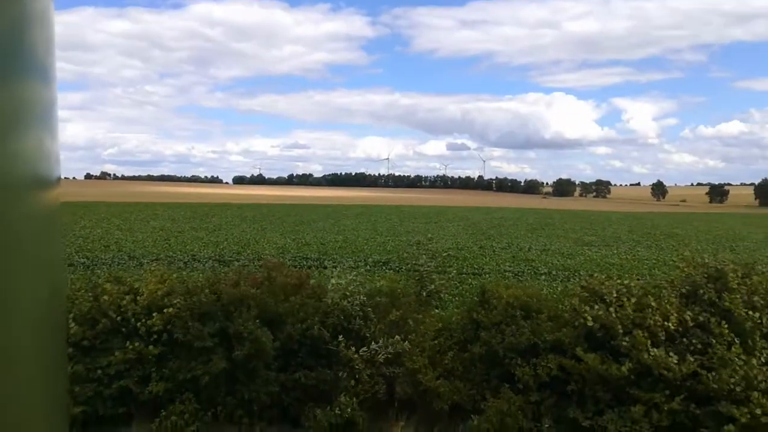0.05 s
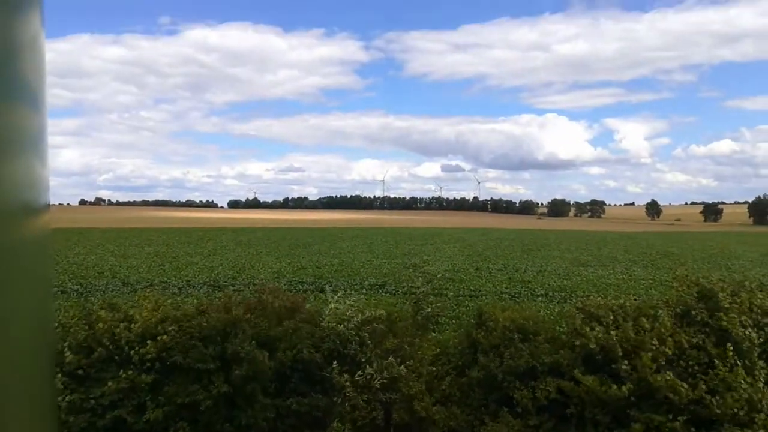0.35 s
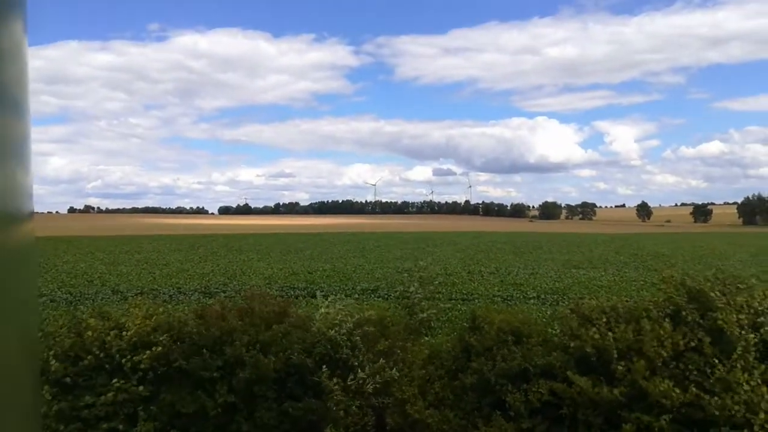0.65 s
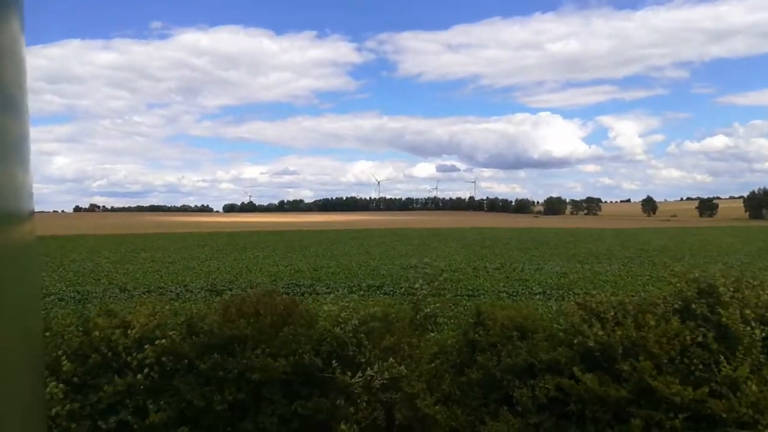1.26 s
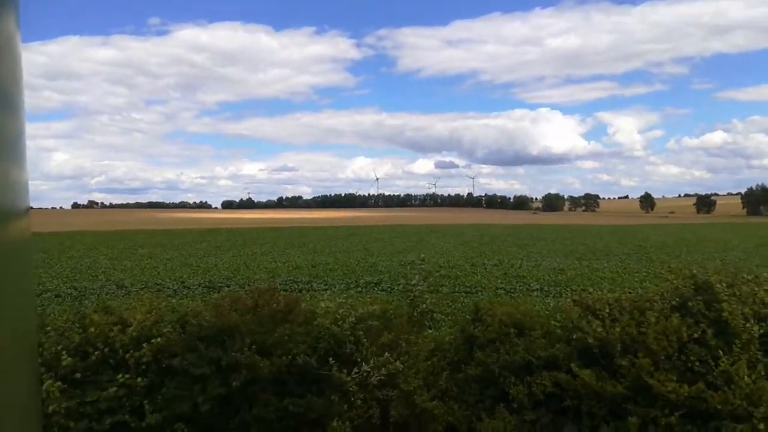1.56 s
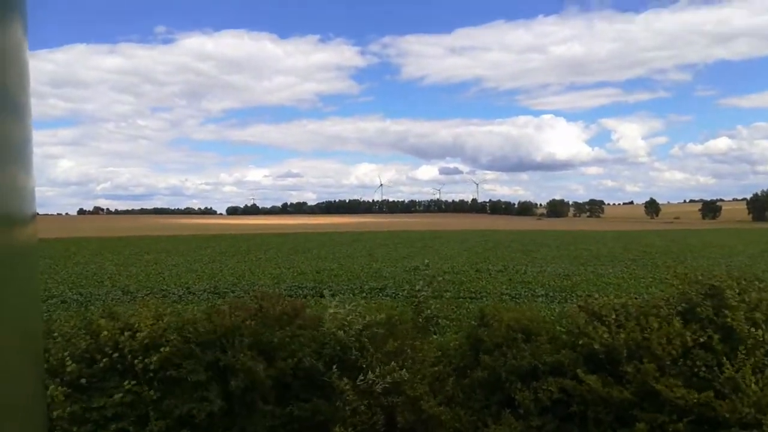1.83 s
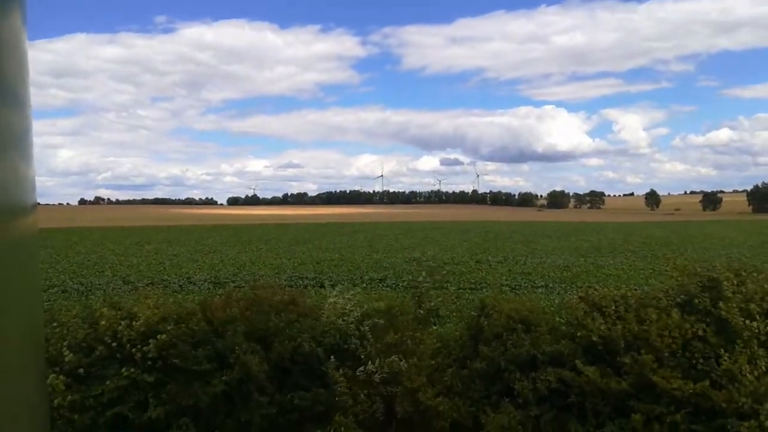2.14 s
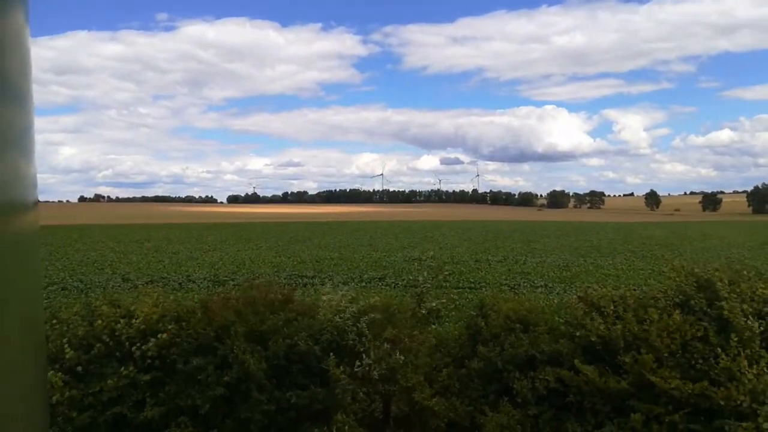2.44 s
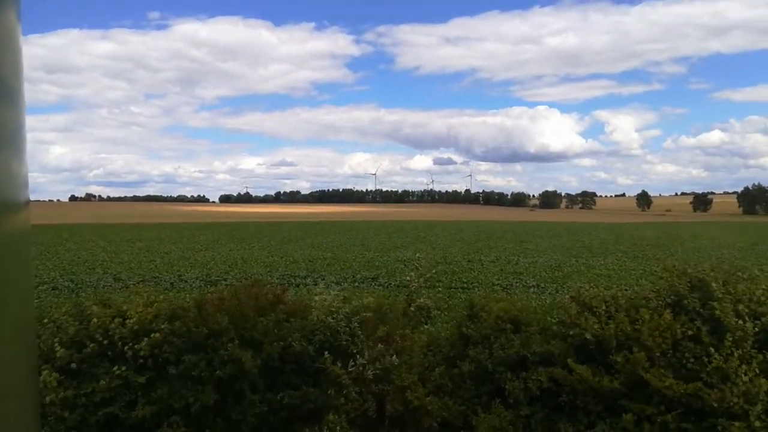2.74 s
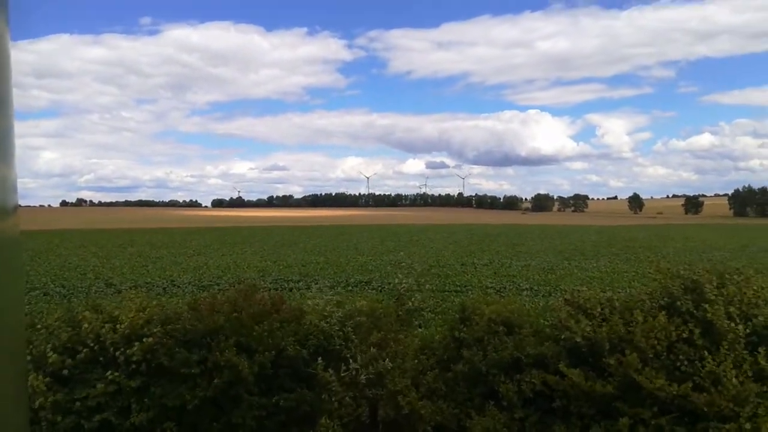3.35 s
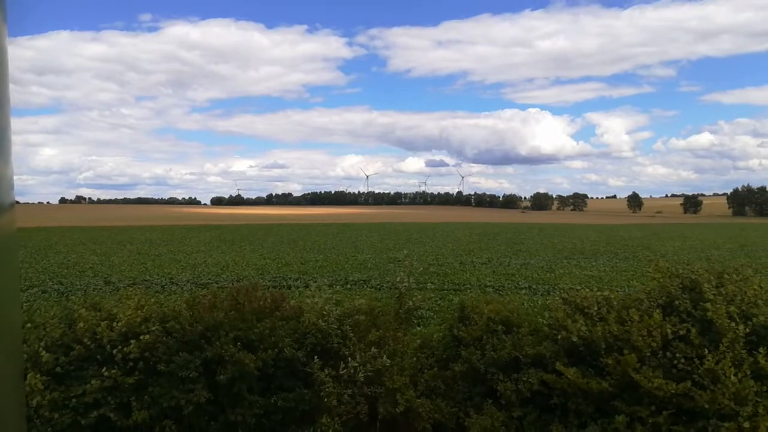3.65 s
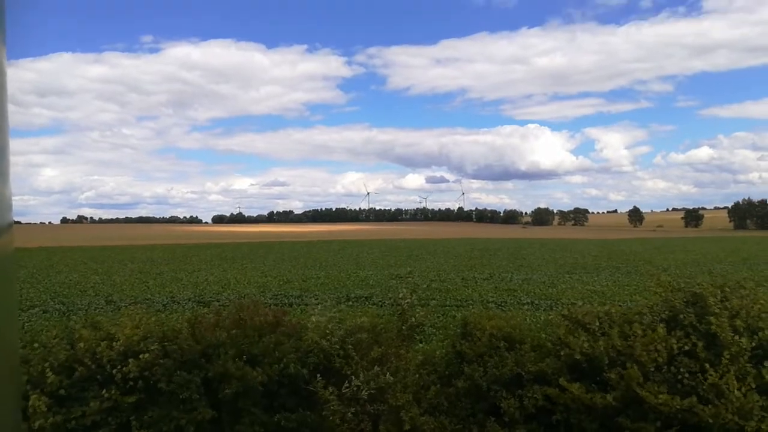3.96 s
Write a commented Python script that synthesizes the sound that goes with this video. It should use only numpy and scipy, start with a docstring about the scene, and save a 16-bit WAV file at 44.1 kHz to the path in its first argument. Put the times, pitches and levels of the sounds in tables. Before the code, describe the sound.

Uneven wind gusts buffet the microphone with a low rumble, fluttering and a few bumps.

```python
"""Wind gusts in an open field buffet the two ports (openings) of a hand-held microphone.
Big eddies (swirls of air) rumble; small ones flutter, turning into a rasp as the flow quickens.
The air tears away from the right port in hard puffs, and an eddy that hits a port squarely bumps.
Under it lie faint hiss and a thin electronic whine.
Each port leaks, late and dull, into the other channel."""
import sys
import numpy as np
from scipy.fft import rfft, irfft, next_fast_len
from scipy.io import wavfile
from scipy.ndimage import uniform_filter1d, map_coordinates

SR = 44100
rng = np.random.default_rng(int(sys.argv[2]) if len(sys.argv) > 2 else 0)


def wav_record(signal):
    """Record a signal, one row per channel, as 16-bit PCM in the file named by sys.argv[1]."""
    frames = np.transpose(np.atleast_2d(signal))
    bounded = np.clip(frames, -1, 1)
    # unit amplitude maps onto the largest positive 16-bit level
    quanta = np.round(bounded * 32767).astype(np.int16)
    wavfile.write(sys.argv[1], SR, quanta)


N = 176400

# The underlying wind. A pan is left minus right, so below zero means to the right.
# Columns: time_s, rumble_db, flutter_db, flutter_pan_db
WIND_FLOW = [(0.0, -36.5, -60, 24), (0.25, -32, -55, 8), (0.45, -28.5, -41, 2), (0.55, -39, -67, 3),
             (0.8, -47.5, -75, 14), (1.0, -44.5, -72, -10), (1.09, -38, -72, -10),
             (1.22, -24.5, -26.5, -20), (1.38, -24.5, -36, -24), (1.6, -28.5, -44, 24),
             (1.8, -25.5, -60, -18), (2.0, -35, -61, 19), (2.35, -32.5, -56, -7), (2.7, -31.5, -50.5, 22),
             (3.02, -31.5, -52.5, -11), (3.14, -23, -27, 22), (3.26, -29, -44, -9), (3.5, -27.5, -31, -2.5),
             (3.61, -27, -40.5, -3), (3.7, -27.5, -30, -11), (3.83, -19.5, -24, -17), (4.0, -26, -31, 1.5)]
# Short puffs on top of it. Columns: centre_s, half_length_s, rumble_db, flutter_db, flutter_pan_db
WIND_PUFFS = [(0.144, 0.0073, -31.5, -40, -21), (0.241, 0.05, -33, -43.5, 5),
              (0.38, 0.037, -41, -39.5, -16), (0.425, 0.012, -31, -35, -17), (0.576, 0.0056, -32, -56, 19),
              (0.739, 0.011, -33.5, -60, 8), (1.042, 0.016, -26, -39, -13),
              (1.137, 0.022, -25, -35.5, -5.5), (1.19, 0.015, -27, -27, -23), (1.264, 0.024, -33, -22, -16),
              (1.329, 0.021, -23.5, -22, -19), (1.372, 0.012, -36, -25.5, -12),
              (1.417, 0.017, -16, -23.5, 19), (1.468, 0.01, -24, -31.5, 8), (1.505, 0.006, -16, -34.5, 10),
              (1.515, 0.015, -19.5, -28, -25), (1.566, 0.0083, -19, -30, -14), (1.612, 0.012, -21, -41, 14),
              (1.672, 0.016, -22, -32, -19), (1.715, 0.013, -29, -28, -8),
              (1.762, 0.018, -29.5, -28.5, -14), (1.807, 0.011, -41, -24, -14),
              (1.852, 0.0091, -20, -32.5, 5), (1.897, 0.0045, -22, -36.5, 24),
              (1.95, 0.015, -21.5, -30.5, -11), (2.06, 0.022, -23.5, -40.5, 4),
              (2.141, 0.0083, -22, -43, -19), (2.215, 0.029, -24.5, -43, 7), (2.425, 0.044, -27, -45.5, 17),
              (2.589, 0.014, -24, -37, 5), (2.737, 0.0063, -23.5, -64, 12), (2.84, 0.0044, -27, -35, -24),
              (2.937, 0.02, -34, -29.5, -26), (2.999, 0.0056, -32, -38, 13),
              (3.088, 0.008, -20.5, -30.5, -10), (3.142, 0.016, -28, -23.5, -13),
              (3.204, 0.0037, -39, -27, 22), (3.297, 0.017, -23, -31.5, -8), (3.356, 0.014, -25, -32, -22),
              (3.436, 0.011, -23.5, -18, -19), (3.522, 0.0056, -18, -23, -12),
              (3.545, 0.023, -24, -25.5, -25), (3.655, 0.011, -21.5, -21.5, -12),
              (3.683, 0.015, -20.5, -20, -33), (3.721, 0.0061, -22, -25, -21),
              (3.794, 0.0063, -29, -20.5, -19), (3.862, 0.011, -24, -22, -26),
              (3.888, 0.017, -41, -21.5, -28)]
# Bursts where the air tears away from the right port. Columns: centre_s, half_length_s, level_db
TEAR_BURSTS = [(1.261, 0.0085, -35.5), (1.328, 0.004, -38.5), (1.753, 0.0016, -25.5), (3.141, .006, -48),
               (3.429, 0.005, -37), (3.649, 0.0036, -33.5), (3.681, 0.0044, -32), (3.698, 0.0037, -29.5),
               (3.79, .005, -35.5), (3.865, 0.0058, -21), (3.877, 0.023, -33)]
# Single eddies that hit a port. Columns: centre_s, level_db, half_length_s, pan_db
EDDY_HITS = [(0.2767, -16, 0.00049, 20), (0.379, -19.5, 0.0005, -16), (1.044, -21.5, 0.00058, -14),
             (1.3222, -7.5, 0.0005, -17), (1.475, -14.5, 0.00026, -17), (1.566, -18, 0.0012, -10),
             (1.662, -15, 0.0029, 7), (1.7534, -2, 0.0014, -17), (1.808, -29, .0005, -19),
             (2.577, -20, 0.00095, -22), (3.001, -24.5, .0006, 17), (3.4265, -7, 0.0013, -34),
             (3.496, -13.5, 0.0018, 8), (3.653, -6.5, 0.0018, -33), (3.86, -7.5, .002, -12)]
# The tone colour of each noise. Columns: frequency_hz, relative_level_db
RUMBLE_COLOUR = [(15, -9), (30, -11.5), (55, 0), (100, -4.5), (170, -5.5), (280, -13.5), (450, -32),
                 (900, -66), (3500, -120)]
BODY_COLOUR = [(60, -66), (140, -5.5), (230, -2), (350, -1.5), (550, -8), (900, -17.5), (1600, -63),
               (4000, -58), (12000, -120)]
FLUTTER_COLOUR = [(150, -16), (400, 0), (700, 3), (1200, -4), (1700, -15.5), (2500, -24.5), (4000, -35.5),
                  (8000, -61), (15000, -100)]
RASP_COLOUR = [(600, -18), (1400, 5.5), (2500, -5.5), (4000, -17), (6500, -27), (10000, -48), (15000, -63)]
TEAR_COLOUR = [(700, -26), (1600, 6.5), (3000, 1), (4500, -5), (7000, -13), (10000, -20), (15000, -43)]
HISS_COLOUR = [(100, -9), (600, -16.5), (1100, -1.5), (1500, -1), (1950, 6), (2250, -1.5), (2650, -6.5),
               (3000, 0.5), (3500, 3.5), (4600, -1.5), (6600, -3), (8500, -11.5), (10000, -12.5),
               (12000, -17), (15000, -21)]
# The whine's tones that waver round a set level. Columns: pitch_multiple, level_db, waver_db
WHINE_TONES = [(1, -55.5, 0.27), (4, -82, 3)]
# Its tones at two and three times the pitch, which swell and fade. Columns: time_s, level_db
WHINE_SECOND_TONE = [(0, -56.5), (.3, -58), (.4, -61.5), (.65, -62), (.85, -55.5), (1.15, -56.5),
                     (1.3, -60), (1.55, -54.5), (1.7, -61.5), (2.35, -64), (2.43, -80), (2.53, -62),
                     (2.85, -63), (3.07, -68), (3.2, -62.5), (4, -64)]
WHINE_THIRD_TONE = [(0, -78), (.4, -79), (1, -70.5), (1.3, -85), (1.55, -69), (2.2, -71), (2.45, -67),
                    (3, -67), (3.7, -78), (4, -66)]

RUMBLE_GAIN_DB, BODY_GAIN_DB, FLUTTER_GAIN_DB, RASP_GAIN_DB = -2.5, -5.5, 0.5, -12.5
BODY_SHARE, BODY_LIFT_DB = 0.29, 9.5  # how far the body follows the flutter rather than the rumble
RASP_PIVOT_DB, RASP_GROWTH = -27, 1.92  # the rasp outgrows the flutter in strong flow
SPUTTER_HZ, SPUTTER_DB = 28.05, 1  # chance swings of the whole flow
PORT_SWING_HZ, PORT_SWING_DB = 39.98, 1.3  # chance swings at each port alone
SNAP_S, SNAP_DB, FIZZ_S, FIZZ_DB = 0.00022, -8, 0.0038, -11.5  # suction at an eddy's core, fizz round it
RING_HZ, RING_DECAY_S, RING_DB = 1010, 0.0015, -9  # the hollow of the port, knocked by an eddy
WHINE_HZ, HISS_DB = 3924.3, -55
TEAR_PAN_DB, WHINE_PAN_DB, HISS_PAN_DB = -26.5, -28, -7
LEAK_DELAY_S, LEAK_CUTOFF_HZ, LEAK_BASS_GAIN, LEAK_TREBLE_GAIN = 0.0005236, 330, 0.92, 0.067
TREBLE_LIMIT_HZ = 15800


def wind():
    """Big eddies rumble on both ports; smaller ones flutter and rasp on the port facing the flow."""
    rumble_db, flutter_db = flow_levels()
    sputter_db = SPUTTER_DB * wobble(SPUTTER_HZ, channels=1)
    rumble_db = rumble_db + sputter_db
    flutter_db = flutter_db + sputter_db + PORT_SWING_DB * wobble(PORT_SWING_HZ)
    body_db = rumble_db + BODY_SHARE * (flutter_db + BODY_LIFT_DB - rumble_db)
    rasp_db = RASP_PIVOT_DB + RASP_GROWTH * (flutter_db - RASP_PIVOT_DB)
    eddies = unit(wobble(75, channels=1) + 0.62 * wobble(110) + 0.93 * wobble(320))
    low_noise = lumpy(noise(RUMBLE_COLOUR), wobble(50, channels=1), depth_db=2.64, span_s=0.06)
    rumble = amp(rumble_db + RUMBLE_GAIN_DB) * low_noise
    # The body fills the pitches between rumble and flutter.
    body = amp(body_db + BODY_GAIN_DB) * lumpy(noise(BODY_COLOUR), eddies, depth_db=3.5)
    flutter = amp(flutter_db + FLUTTER_GAIN_DB) * lumpy(noise(FLUTTER_COLOUR), eddies, depth_db=4.5)
    rasp = amp(rasp_db + RASP_GAIN_DB) * lumpy(noise(RASP_COLOUR), eddies, depth_db=4.5)
    return rumble + body + flutter + rasp


def flow_levels():
    """The flow plus its puffs, in dB: one rumble level, and a flutter level for each port."""
    t = np.arange(N) / SR
    times_s, *columns = np.transpose(WIND_FLOW)
    rumble_db, flutter_db, pan_db = [np.interp(t, times_s, column) for column in columns]
    rumble_power = amp(rumble_db) ** 2
    flutter_power = (amp(flutter_db) * pan(pan_db)) ** 2
    for centre_s, half_s, rumble_db, flutter_db, pan_db in WIND_PUFFS:
        near = slice(*np.searchsorted(t, [centre_s - 4 * half_s, centre_s + 4 * half_s]))
        swell = np.exp(-((t[near] - centre_s) / half_s) ** 2)
        rumble_power[near] += amp(rumble_db) ** 2 * swell
        flutter_power[:, near] += (amp(flutter_db) * pan(pan_db)) ** 2 * swell
    return 10 * np.log10(rumble_power), 10 * np.log10(flutter_power)


def tearing_air():
    """In hard puffs the flow breaks away from the right port in short, bright, rough bursts."""
    t = np.arange(N) / SR
    power = sum(amp(level_db) ** 2 * np.exp(-((t - centre_s) / half_s) ** 2)
                for centre_s, half_s, level_db in TEAR_BURSTS)
    rough = lumpy(noise(TEAR_COLOUR, channels=1), wobble(700, channels=1), depth_db=3.5, span_s=0.011)
    return np.sqrt(power) * pan(TEAR_PAN_DB) * rough


def eddy_bumps():
    """An eddy presses on a port, snaps over into suction and briefly makes its hollow ring."""
    bumps = np.zeros((2, N))
    fizz_noise = noise(FLUTTER_COLOUR, channels=1)
    for centre_s, level_db, half_s, pan_db in EDDY_HITS:
        t = np.arange(N) / SR - centre_s
        after_s = np.maximum(t, 0)
        passage = t / half_s + 0.5  # below zero the eddy pushes, above zero it pulls
        push_pull = -0.45 * passage * np.exp(1 - np.abs(passage))
        snap = -amp(SNAP_DB) / (1 + (t / SNAP_S) ** 2)
        ring_shape = np.exp(-after_s / RING_DECAY_S) * np.tanh(after_s / SNAP_S)
        ring = amp(RING_DB) * np.sin(2 * np.pi * RING_HZ * after_s) * ring_shape
        fizz = amp(FIZZ_DB) * fizz_noise * np.exp(-np.abs(t) / FIZZ_S)
        bumps += amp(level_db) * pan(pan_db) * (push_pull + snap + ring + fizz)
    return bumps


def electronics():
    """The electronics add a wavering whine and a steady hiss, mostly on the right."""
    phase = 2 * np.pi * WHINE_HZ * np.arange(N) / SR
    whine = sum(wavering(level_db, waver_db, rate_hz=7.11) * np.sin(multiple * phase)
                for multiple, level_db, waver_db in WHINE_TONES)
    whine += wavering(curve(WHINE_SECOND_TONE), waver_db=2.2, rate_hz=11) * np.sin(2 * phase)
    whine += wavering(curve(WHINE_THIRD_TONE), waver_db=1, rate_hz=9) * np.sin(3 * phase)
    hiss = amp(HISS_DB) * noise(HISS_COLOUR)
    return np.sqrt(2) * whine * pan(WHINE_PAN_DB) + hiss * pan(HISS_PAN_DB)


def amp(db):
    """Turn decibels into a gain to multiply by."""
    return 10 ** (np.asarray(db) / 20)


def unit(x):
    """Scale a signal to an average power of 1."""
    return x / np.sqrt(np.mean(x ** 2) + 1e-20)


def pan(pan_db):
    """Left and right gains whose powers add up to 1."""
    left = np.atleast_1d(amp(pan_db))
    return np.array([left, np.ones_like(left)]) / np.sqrt(1 + left * left)


def curve(rows):
    """Join (time_s, value) rows with straight lines, one value per sample."""
    return np.interp(np.arange(N) / SR, *np.transpose(rows))


def wobble(rate_hz, channels=2):
    """Smooth curves through rate_hz random points a second."""
    position = np.arange(N) * rate_hz / SR
    points = rng.standard_normal((channels, 4096))
    return np.array([map_coordinates(row, [position], mode="wrap") for row in points])


def wavering(level_db, waver_db, rate_hz):
    """A gain that drifts by chance round level_db."""
    return amp(level_db + waver_db * wobble(rate_hz, channels=1))


def filtered(x, response):
    """Scale and delay each frequency of x as response(hz) says."""
    size = next_fast_len(N + SR // 4)
    return irfft(rfft(x, size) * response(np.fft.rfftfreq(size, 1 / SR)), size)[..., :N]


def noise(colour, channels=2):
    """A separate noise for each channel, with the given tone colour and an average power of 1."""
    points_hz, levels_db = np.transpose(colour)
    white = rng.standard_normal((channels, N))
    return unit(filtered(white, lambda hz: amp(np.interp(np.log(hz + 1), np.log(points_hz), levels_db))))


def lumpy(x, eddies, depth_db, span_s=0.027):
    """Passing eddies break a noise into lumps; swells slower than span_s are evened out."""
    lumps = x * amp(depth_db * eddies)
    local_power = uniform_filter1d(np.mean(lumps ** 2, axis=0), max(int(span_s * SR), 8))
    return lumps / np.sqrt(np.abs(local_power) + 1e-9)


def scene():
    """Wind on the two ports, over faint electronics."""
    return wind() + tearing_air() + eddy_bumps() + electronics()


def record(dry):
    """Each port leaks, late and dull, into the other channel; the highest treble is cut off."""
    def leak(hz):
        dulling = LEAK_TREBLE_GAIN + (LEAK_BASS_GAIN - LEAK_TREBLE_GAIN) / (1 + 1j * hz / LEAK_CUTOFF_HZ)
        return dulling * np.exp(-2j * np.pi * hz * LEAK_DELAY_S)

    from_other_port = filtered(dry[::-1], leak)
    return filtered(dry + from_other_port, lambda hz: hz < TREBLE_LIMIT_HZ)


dry = scene()
out = record(dry)
wav_record(out)
```